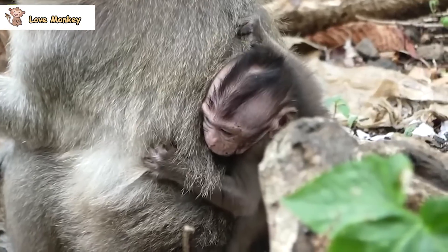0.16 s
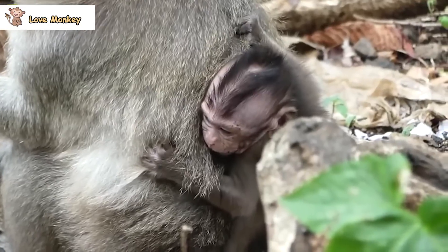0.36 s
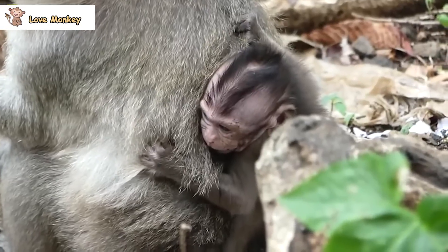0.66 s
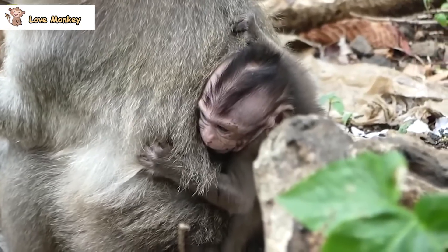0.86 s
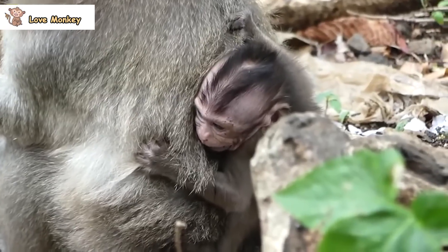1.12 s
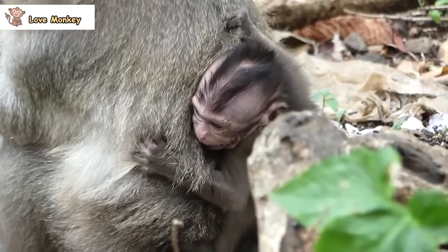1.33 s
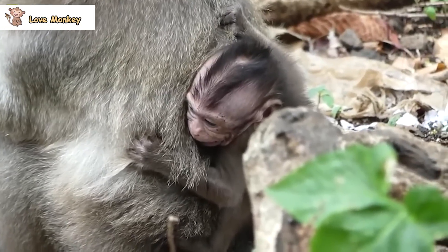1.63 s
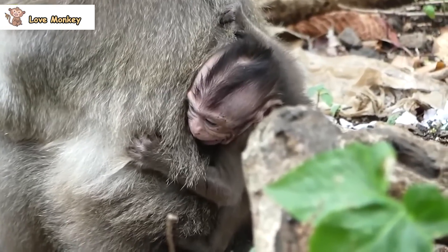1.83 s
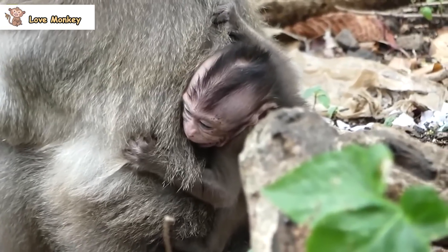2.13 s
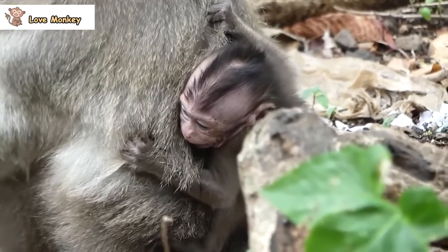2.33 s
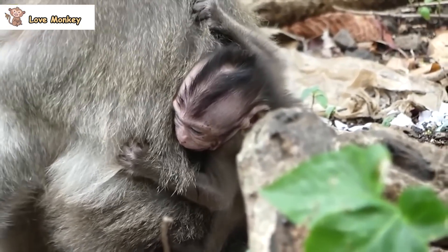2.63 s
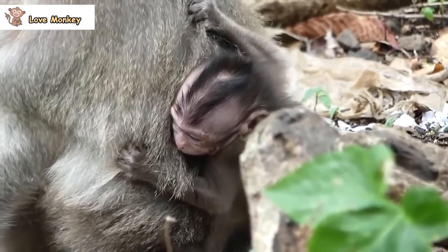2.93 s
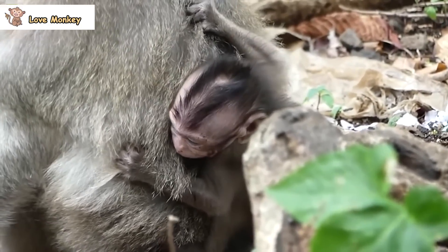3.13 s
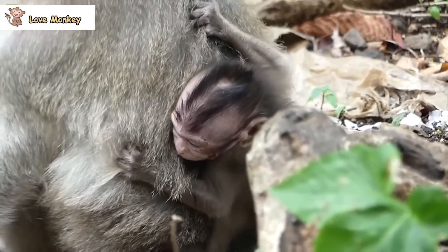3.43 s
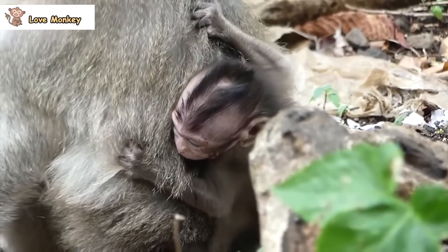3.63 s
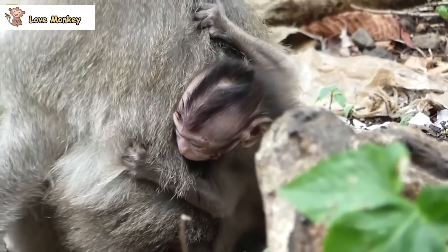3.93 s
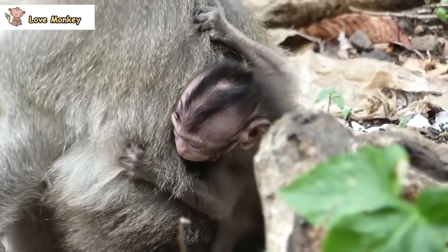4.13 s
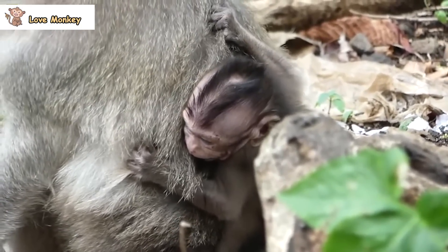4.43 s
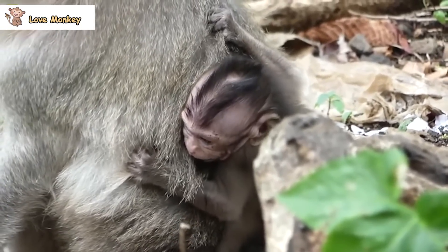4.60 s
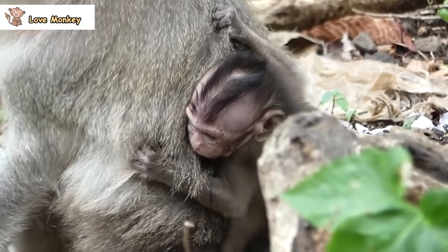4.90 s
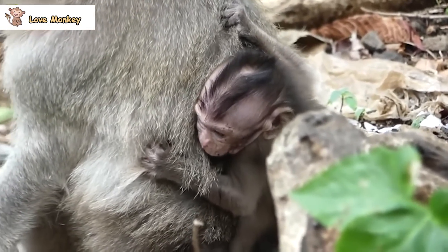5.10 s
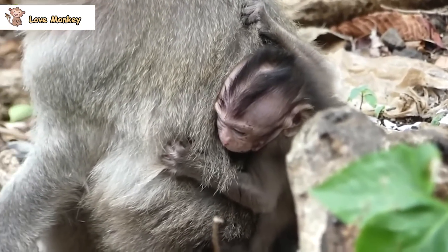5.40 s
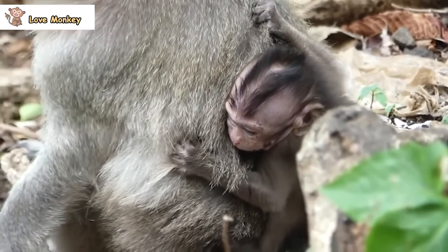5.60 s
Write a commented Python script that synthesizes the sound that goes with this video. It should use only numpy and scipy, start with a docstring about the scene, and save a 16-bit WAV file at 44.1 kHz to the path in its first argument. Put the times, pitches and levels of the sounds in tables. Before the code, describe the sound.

Three piercing infant monkey screams break into rasps and whistles, followed by softer whimper, yelp and rounded coo on a quiet forest floor.

```python
"""Baby macaque screaming on a forest floor

Close by, a hoarse squawk opens three shrill screams that break into rasps and whistles; whimper, yelp and coo follow.
Voices are summed partials, irregular under strain, filtered by throat tables; rasps are sliding air tones.
Leaves and twigs tick as ringing noise bursts; faint squeaks are softer voices of the same kind.
A far engine is a pulse train through exhaust resonances; foliage and distant traffic are coloured stereo noise."""
import sys
import numpy as np
from scipy import signal
from scipy.fft import rfft, irfft
from scipy.io import wavfile
from scipy.ndimage import uniform_filter1d, map_coordinates

SR = 44100
rng = np.random.default_rng(int(sys.argv[2]) if len(sys.argv) > 2 else 0)


def store_wav(level_fs):
    """Save 16-bit WAV to argv[1]."""
    pcm = np.round(np.clip(np.atleast_2d(level_fs), -1, 1) * 32767)
    wavfile.write(sys.argv[1], SR, pcm.T.astype(np.int16))


N = 253575
TIME = np.arange(N) / SR


def screams():
    """Three screams: a voiced climb up to the break, rough bursts, then clear loud sweeps."""
    # voiced openings: start_s, push_s, break_s, start_hz, break_hz, start_db, break_db
    climb_rows = [(.789, .886, .938, 1070, 1365, -47, -36.5), (1.305, 1.312, 1.337, 1080, 1410, -47, -36),
                  (1.795, 1.803, 1.828, 1160, 1410, -45, -31.5)]
    # broken voice: start_s, end_s, start_hz, end_hz, level_db, roughness (0-1)
    burst_rows = [(.933, .948, 1380, 1430, -35.5, .45), (.946, .961, 1370, 1410, -35, .55),
                  (.961, .979, 1370, 1410, -33.5, .45), (.982, 1.009, 1390, 1530, -33.5, .36),
                  (1.006, 1.036, 1580, 1790, -35, .28), (1.033, 1.048, 1440, 1560, -32.5, .55),
                  (1.333, 1.356, 1230, 1380, -36.5, .58), (1.354, 1.366, 1320, 1460, -35, .42),
                  (1.825, 1.850, 1200, 1520, -33, .56), (1.847, 1.861, 1520, 1930, -29.5, .42),
                  (1.860, 1.867, 1350, 1800, -31, .35)]
    # clear sweeps: start_s, peak_s, end_s, start_hz, end_hz, peak_db, roughness (0-1)
    sweep_rows = [(1.043, 1.058, 1.067, 3480, 3780, -28, .12),
                  (1.360, 1.371, 1.384, 2800, 3850, -27.7, .12),
                  (1.378, 1.385, 1.394, 3900, 4550, -36, .15), (1.541, 1.551, 1.555, 5400, 4450, -41, .25),
                  (1.551, 1.559, 1.573, 4650, 2500, -28, .28), (1.865, 1.869, 1.878, 3600, 4600, -21.3, .1),
                  (1.875, 1.878, 1.888, 4500, 5300, -39, .15), (2.125, 2.131, 2.145, 3650, 2650, -31, .17)]
    # throat and mouth while soft, pushed and broken: freq_hz, gain_db
    narrow_mouth = [(600, -22), (1120, -8), (1650, -18), (2000, -6), (2300, 0), (3150, -1), (3600, -10),
                    (4500, -19), (5400, -16), (6800, -21), (8000, -33), (10000, -28), (12500, -21),
                    (14500, -38)]
    scream_throat = [(600, -36), (1200, -12), (1650, -23), (2200, -9), (2700, 0), (3300, -5), (4000, -4),
                     (5100, -5), (5700, -18), (6500, -9), (8000, -30), (10000, -27), (12800, -27),
                     (14500, -40)]
    broken_throat = [(600, -36), (1200, -14), (1600, -23), (2000, -5), (2400, -5), (2800, -3), (3500, -1),
                     (4100, 2), (4900, -7), (5600, -21), (6900, -12), (8200, -27), (10000, -26),
                     (11500, -32), (13000, -28), (14500, -40)]

    climbs = [climb(row) for row in climb_rows]
    bursts = [burst(row) for row in burst_rows]
    sweeps = [glide(row, fade_db=9, power=1.4) for row in sweep_rows]
    voice = cries(climbs, scream_throat, soft_throat=narrow_mouth, jitter=.05, rasp=.7,
                  air_db=-21, flutter_db=.6, flicker_db=1, smear=.01)
    voice += cries(bursts, broken_throat, jitter=.04, rasp=.5, fade=1.2, air_db=-21, flutter_db=.2,
                   flicker_db=1.1, smear=.01, quaver=.02, second_db=6, break_hz=1660)
    voice += cries(sweeps, broken_throat, jitter=.05, rasp=.6, air_db=-27, flutter_db=.8,
                   smear=.01, second_db=-10)
    return voice


def whistling_tones():
    """One long wavering whistle, short glides, narrow bands ringing in the rasp, a squeak's upper partial."""
    # long whistle: time_s, pitch_hz, level_db
    long_whistle = [(1.425, 5918, -55), (1.439, 6075, -44), (1.449, 7257, -43), (1.459, 7607, -43),
                    (1.483, 7328, -42), (1.499, 7611, -43), (1.507, 8264, -49), (1.519, 8205, -49),
                    (1.548, 7076, -44)]
    # short tones and bands: start_s, peak_s, end_s, start_hz, end_hz, peak_db, roughness (0-1)
    tone_rows = [(.817, .826, .829, 3800, 4450, -50, .1), (.827, .834, .85, 4400, 3350, -49, .2),
                 (1.877, 1.886, 1.905, 13300, 13900, -46, .3), (1.898, 1.915, 1.93, 13600, 14300, -45, .3),
                 (1.922, 1.934, 1.945, 12600, 13400, -46, .3), (1.946, 1.955, 1.975, 12300, 11850, -38, .1),
                 (1.945, 1.985, 1.997, 3900, 4350, -43, .38), (2.003, 2.027, 2.055, 4150, 4500, -42.5, .38),
                 (1.98, 2.02, 2.06, 8950, 9250, -49, .25), (2.11, 2.128, 2.14, 4500, 4300, -35.5, .3),
                 (2.87, 2.885, 2.92, 7000, 6900, -63, .6)]
    # colouring: freq_hz, gain_db
    tone_colour = [(600, -28), (1500, -8), (3500, 1.5), (7500, -8), (12000, -28), (16000, -12)]
    calls = [waver(long_whistle, rough=.1, gain_db=0.0)]
    calls += [glide(row, fade_db=13, power=1.5) for row in tone_rows]
    return cries(calls, tone_colour, jitter=.1, rasp=.3, air_db=-21, flutter_db=1.6, second_db=-2)


def rasps(flutter_db=1.3, width=0.5):
    """Air forced through the closed throat sputters; the throat's resonance rises as it tightens."""
    # toneless rasps: start_s, peak_s, end_s, peak_db, treble_relative_db
    rasp_rows = [(.92, 1.03, 1.09, -60, 2), (1.3, 1.34, 1.41, -61, 1), (1.8, 1.84, 1.88, -59, 2),
                 (1.415, 1.47, 1.54, -58, 2), (1.533, 1.553, 1.6, -46, -1), (1.855, 1.89, 1.96, -50.5, 4),
                 (1.89, 2.02, 2.185, -46, 5), (2.078, 2.09, 2.1, -36.5, -8), (2.105, 2.124, 2.14, -40, -10)]
    # throat and the treble added to it: freq_hz, gain_db
    rasp_throat = [(600, -17), (1200, -17), (1700, -22), (2600, -13), (3300, -1), (4250, 6), (5100, 2.5),
                   (5600, -12), (6800, -2), (9000, -38), (15000, -60)]
    rasp_treble = [(4500, -24), (5600, -20), (6400, -2), (7500, 3), (8400, -3), (9150, 7), (9700, 2),
                   (10200, 5), (10700, 1), (12000, 12), (12450, 7), (13000, 10), (13700, 6), (14300, -12),
                   (15000, -35)]
    tighten_per_s, hold_after_peak_s = .9, .04
    out = np.zeros((2, N))
    for start, peak, end, peak_db, treble_db in rasp_rows:
        t, db = swell(start, peak, end, fade_db=18, power=2.6)
        count = len(t)
        # reading the sound ever faster raises its resonance
        read_at = np.cumsum(1 + tighten_per_s * np.minimum(t - peak, hold_after_peak_s))
        air = colour(sputter(count), rasp_throat)
        throat = map_coordinates(air, [read_at], order=3, mode="mirror")
        treble = steady(colour(sputter(count), rasp_treble))
        centre = steady(throat) + undb(treble_db) * treble
        # the highest hiss sounds diffuse
        side = width * undb(treble_db) * unit(colour(sputter(count), rasp_treble))
        envelope = undb(peak_db + db + flutter_db * walk(count, 301)) * soft_edges(t)
        add(out[0], t[0], (centre + side) * envelope)
        add(out[1], t[0], (centre - side) * envelope)
    return out


def sputter(count, depth_db=5, rate=60):
    """Unsteady air tones that slide about, flare up and die, each on its own."""
    slide_hz, blur_hz = 170, 190
    sound = 0
    for hz in range(1000, 15000, 450):
        pitch_hz = hz + slide_hz * walk(count, 55) + blur_hz * walk(count, 700)
        tone = np.sin(2 * np.pi * (rng.random() + np.cumsum(pitch_hz) / SR))
        sound = sound + tone * undb(depth_db * walk(count, rate))
    return sound / np.sqrt(uniform_filter1d(sound ** 2, size=900))


def whimper():
    """A whimper whose fundamental thins out as it goes on."""
    # path: time_s, pitch_hz, level_db before gain_db
    whimper_path = [(3.36, 870, -62), (3.382, 988, -51), (3.412, 1080, -48), (3.47, 1059, -49),
                    (3.532, 1262, -47.5), (3.556, 1200, -49), (3.572, 1100, -44), (3.636, 1118, -46),
                    (3.675, 1090, -50), (3.705, 1035, -58), (3.754, 1106, -59), (3.775, 1095, -68)]
    # throat: freq_hz, gain_db
    whimper_throat = [(600, -14), (1080, -5), (1260, -1), (1650, -18), (2200, 3), (2550, 0), (3250, -4),
                      (3750, -2.5), (4400, -3.5), (5000, -8), (5450, -20), (6600, -27), (7700, -41),
                      (9600, -24), (11000, -28), (12500, -20), (15000, -40)]
    return cries([waver(whimper_path, rough=.05, gain_db=-.7)], whimper_throat, jitter=.14, rasp=1.3,
                 air_db=-29, flutter_db=.5, smear=.01, thin_db=9, tire_db=2)


def yelp():
    """A softer cry built like a scream: climb, burst and sweep."""
    # climb: start_s, push_s, break_s, start_hz, break_hz, start_db, break_db
    climb_row = (4.078, 4.092, 4.156, 1060, 1340, -49, -42)
    # burst: start_s, end_s, start_hz, end_hz, level_db, roughness (0-1)
    burst_row = (4.151, 4.176, 1420, 1490, -41.5, .43)
    # sweep: start_s, peak_s, end_s, start_hz, end_hz, peak_db, roughness (0-1)
    sweep_row = (4.167, 4.177, 4.198, 1220, 2050, -43.5, .27)
    # throat: freq_hz, gain_db
    yelp_throat = [(600, -16), (1200, -5), (1700, -13), (2400, 0), (3100, -3), (3600, -3), (4300, -3),
                   (5400, -18), (6600, -21), (7700, -33), (9600, -21), (11000, -27), (12500, -21),
                   (15000, -40)]
    calls = [climb(climb_row), burst(burst_row), glide(sweep_row, fade_db=9, power=1.4)]
    return cries(calls, yelp_throat, jitter=.09, rasp=.8, fade=.5, air_db=-20, flutter_db=1,
                 flicker_db=1, smear=.02, second_db=1)


def squawk():
    """A hoarse opening squawk: one rough push of the folds."""
    # start_s, peak_s, end_s, start_hz, end_hz, peak_db, roughness (0-1)
    squawk_row = (.053, .08, .14, 775, 745, -47.5, .6)
    # throat: freq_hz, gain_db
    squawk_throat = [(600, -16), (1200, -5), (1700, -22), (2250, -7), (3100, 0), (3750, 0.5), (4500, -11),
                     (5200, -6), (6300, -10), (8000, -30), (15000, -40)]
    return cries([glide(squawk_row, fade_db=9, power=1.8)], squawk_throat, jitter=.07, rasp=1.1,
                 air_db=-22, flutter_db=.6)


def coo():
    """A clear coo: one pitch arch with a wavering top."""
    # arch: time_s, pitch_hz, level_db before gain_db
    coo_path = [(4.677, 1050, -65), (4.687, 1080, -57), (4.748, 1381, -42), (4.775, 1440, -39.5),
                (4.806, 1462, -39), (4.822, 1510, -40), (4.86, 1528, -38.5), (4.892, 1522, -38),
                (4.914, 1545, -42), (4.938, 1585, -39), (4.994, 1515, -40), (5.054, 1412, -42),
                (5.104, 1263, -47), (5.135, 1030, -62)]
    # throat: freq_hz, gain_db
    coo_throat = [(700, -16), (1250, -4), (1550, -11.5), (2300, -11), (3000, 0), (3800, -16), (4300, -15),
                  (4700, -26), (5400, -38), (6100, -35), (7600, -42), (9200, -21.5), (10700, -37),
                  (12000, -23), (12700, -18), (13700, -24), (14600, -44)]
    return cries([waver(coo_path, rough=0, gain_db=-.3)], coo_throat, jitter=.05, rasp=.5,
                 air_db=-36, flutter_db=.2, smear=.001, tire_db=3.2, quaver=.0025)


def squeaks():
    """Faint, blurred squeaks between the cries."""
    # start_s, peak_s, end_s, start_hz, end_hz, peak_db, roughness (0-1)
    squeak_rows = [(.2, .25, .32, 3620, 3420, -62, .4), (1.2, 1.29, 1.31, 3400, 2300, -54, .6),
                   (2.49, 2.53, 2.6, 4100, 2300, -61.5, .65), (2.565, 2.58, 2.65, 2550, 2250, -62, .35),
                   (2.65, 2.68, 2.78, 2150, 1400, -62, .5), (2.875, 2.885, 2.905, 3750, 3450, -60, .3),
                   (4.42, 4.48, 4.53, 2500, 1900, -60, .45), (5.2, 5.24, 5.34, 3850, 3000, -61, .55)]
    # throat: freq_hz, gain_db
    squeak_throat = [(600, -20), (1400, -3), (2300, 0), (3600, -2), (5000, -17), (15000, -40)]
    calls = [glide(row, fade_db=10, power=1.1) for row in squeak_rows]
    return cries(calls, squeak_throat, jitter=.2, rasp=.35, air_db=-22, flutter_db=1.3,
                 second_db=-12, smear=.04)


def cries(calls, throat, jitter, rasp, air_db, flutter_db, smear=0, second_db=0, fade=0,
          soft_throat=None, break_hz=None, tire_db=0, thin_db=0, quaver=0, flicker_db=.7):
    """Vibrating folds heard through the throat; under strain they turn irregular and hiss."""
    # hiss of air at the lips: freq_hz, gain_db
    air = [(1000, -14), (2500, -2), (4200, -16), (5700, -4), (6800, 9), (8300, -6), (10000, 6.5),
           (13500, -16), (16000, -36)]
    lips_part_db, mouth_wide_db, jaw_s = -46, -39, .045
    out = np.zeros(N)
    for t, hz, db, rough in calls:
        count = len(t)
        progress = np.linspace(0, 1, count)
        k = np.arange(1, 16)[:, None]  # partial numbers
        # higher partials flicker more, each on its own
        flicker = np.array([walk(count, 55) for _ in k])
        gains = (k * hz < SR * .4) * undb(np.minimum(k, 5.5) * flicker_db * flicker)
        # clear voice: second harmonic raised or lowered
        gains = gains * undb(second_db * (1 - rough) * (k == 2))
        # fundamental thins through the call
        gains = gains * undb(-thin_db * progress * (k == 1))
        # a long call dulls toward its end
        gains = gains * undb(-tire_db * progress ** 3 * np.log2(np.minimum(k, 4)))
        # fundamental drops out with roughness
        gains = gains * np.where(k == 1, np.clip(1 - fade * rough, 0, 1), 1)
        if break_hz:
            # pushed high, the voice flips to an almost pure tone an octave up
            modal = 1 / (1 + (hz / break_hz) ** 12)
            gains = gains * np.where(k % 2, modal, np.where(k > 2, modal + .035, 1))
        # slow tremor, then cycle-to-cycle scatter that blurs high partials first
        tremor = quaver * walk(count, 45) + .003 * walk(count, 130) + .03 * rough * walk(count, 330)
        scatter = (smear + jitter * rough ** 2) * walk(count, 1500)
        phase = 2 * np.pi * np.cumsum(hz * (1 + tremor + scatter)) / SR
        partials = gains * np.sin(k * phase + 2 * np.pi * rng.random(k.shape))
        folds = unit(partials.sum(0))
        # strong and weak cycles in twos and threes: lines between the harmonics
        twos = walk(count, 110) * np.sin(phase / 2)
        threes = walk(count, 120) * np.sin(phase / 3)
        folds *= 1 + 2 * rough ** 2 * (twos + threes)
        source = folds + rasp * rough ** 2 * noise(count, throat)
        tone = colour(source, throat)
        if soft_throat:
            # mouth narrow while soft, opening with the push; the jaw needs time to drop
            opening = np.clip((db - lips_part_db) / (mouth_wide_db - lips_part_db), 0, 1)
            opening = opening * (1 - np.exp(-(t - t[0]) / jaw_s))
            tone = opening * tone + (1 - opening) * colour(source, soft_throat)
        # effort, not the resonance a partial crosses, sets the loudness
        tone = steady(tone)
        # air hisses once a cycle
        hiss = undb(air_db) * (1 + .5 * np.cos(phase)) * noise(count, air)
        flutter = undb((flutter_db + 1.4 * rough) * walk(count, 330))
        add(out, t[0], (tone + hiss) * flutter * undb(db) * soft_edges(t))
    return out


def climb(row):
    """Pitch climbs until the voice breaks; the cry starts softly and is then pushed hard."""
    scoop_share, scoop_s, push_share, attack_db = .13, .012, .5, 9
    clear_rough, crack_rough, roughen_s = .14, .36, .01
    start, push, crack, start_hz, break_hz, start_db, break_db = row
    t = span(start, crack)
    onset = np.exp(-(t - t[0]) / scoop_s)
    effort = np.sin(np.pi / 2 * np.interp(t, [push, crack], [0, 1]))
    rise = (1 - push_share) * np.interp(t, [start, crack], [0, 1]) + push_share * effort
    # scoop up from below
    hz = (start_hz + (break_hz - start_hz) * rise) * (1 - scoop_share * onset)
    db = start_db + (break_db - start_db) * effort - attack_db * onset
    rough = clear_rough + (crack_rough - clear_rough) * np.exp((t - crack) / roughen_s)
    return t, hz, db, rough


def burst(row, fade_db=2.5):
    """One short, rough push of the broken voice, rising in pitch."""
    start, end, start_hz, end_hz, db, rough = row
    return glide((start, (start + end) / 2, end, start_hz, end_hz, db, rough), fade_db, power=2)


def glide(row, fade_db, power):
    """One swell of level while the pitch slides evenly."""
    start, peak, end, start_hz, end_hz, peak_db, rough = row
    t, db = swell(start, peak, end, fade_db, power)
    return t, np.interp(t, [start, end], [start_hz, end_hz]), peak_db + db, rough


def waver(curve, rough, gain_db):
    """A call whose pitch and level wander along a curve, the pitch smoothed."""
    s, hz, db = np.transpose(curve)
    t = span(s[0], s[-1])
    return t, uniform_filter1d(np.interp(t, s, hz), size=400), np.interp(t, s, db) + gain_db, rough


def swell(start_s, peak_s, end_s, fade_db, power):
    """Times and relative level (dB) of a push that grows to its peak and dies away."""
    t = span(start_s, end_s)
    return t, -fade_db * np.interp(t, [start_s, peak_s, end_s], [1, 0, 1]) ** power


def span(start_s, end_s):
    """Sample times of one call."""
    return TIME[int(start_s * SR):int(end_s * SR)]


def soft_edges(t):
    """Fade a call in and out over 3 ms."""
    return np.clip(np.minimum(t - t[0], t[-1] - t) / .003, 0, 1)


def steady(x):
    """Hold the level even over a few milliseconds."""
    return x / np.sqrt(np.maximum(uniform_filter1d(x ** 2, size=350), 0) + 1e-12)


def ticks(snap_s=0.001, crumple_s=0.012):
    """A dry leaf or twig snaps and crumples briefly: noise decays ring its resonances."""
    # time_s, peak_db, treble_peak_db, crumple_relative_to_snap_db
    tick_rows = [(.013, -43, -58, -9), (2.567, -39, -47, -31), (2.877, -45, -54, -20),
                 (2.888, -45, -56, -16), (3.622, -41, -60, -8), (3.744, -41, -60, -8),
                 (3.808, -47, -57, -7), (3.835, -31, -55, -17), (3.956, -35.5, -43, -26),
                 (4.017, -45, -52, -11), (4.065, -46, -50, 3), (4.353, -45, -49, -7), (4.362, -41, -55, -8)]
    # leaf and twig resonances: freq_hz, width_hz, gain_db
    twig = [(1290, 250, 2), (3000, 1100, 6), (5800, 670, -6.5)]
    out, t = np.zeros(N), TIME[:2048]
    for s, db, treble_db, crumple_db in tick_rows:
        envelope = np.exp(-t / snap_s) + undb(crumple_db) * np.exp(-t / crumple_s)
        crackle = rng.standard_normal(len(t)) * envelope
        body = ring(crackle, twig)
        crisp = ring(crackle, [(10100, 9900, 0)])
        add(out, s, undb(db) * body / abs(body).max() + undb(treble_db) * crisp / abs(crisp).max())
    return out


def engine(scatter_db=0.25, low_hz=80, high_hz=300):
    """Each firing of a far single cylinder thumps the exhaust; only the bass arrives."""
    # idle speed: time_s, firings_per_s
    idle = [(0, 21.5), (2.9, 21.5), (3.12, 19.6), (3.3, 20.7), (3.55, 21.28), (4.4, 21.3), (4.7, 21.5),
            (5.75, 21.5)]
    # time_s, level_db, bark_db
    levels = [(0, -61.5, -23), (1.5, -75, -21), (3.05, -57.5, -1), (3.15, -47.5, -1), (3.6, -49.5, 7.5),
              (4.4, -52, -1.5), (5.2, -50.5, -1), (5.75, -52, -6)]
    # exhaust resonances, deep boom and the bark above: freq_hz, width_hz, gain_db
    boom = [(110.4, 4, 1), (125.7, 6.7, 3.5)]
    bark = [(149.3, 11.3, -0.5), (169.7, 24, -10), (222, 80, -17)]
    firing_s = 3.549  # a firing falls here
    s, level_db, bark_level_db = np.transpose(levels)
    db = np.interp(TIME, s, level_db)
    bark_gain = undb(np.interp(TIME, s, bark_level_db))
    turns = np.cumsum(np.interp(TIME, *np.transpose(idle))) / SR
    turns -= np.interp(firing_s, TIME, turns)
    firings = np.diff(np.floor(turns), prepend=np.floor(turns[0]))
    firings = firings * undb(scatter_db * rng.standard_normal(N))
    thumps = ring(firings, boom) + bark_gain * ring(firings, bark)
    band = signal.butter(2, [low_hz, high_hz], "band", fs=SR, output="sos")
    thumps = signal.sosfilt(band, thumps)
    return unit(thumps / np.hypot(1, bark_gain)) * undb(db)


def hush(waver_db=-1.15, above_db=7.4):
    """Distant traffic and foliage: coloured noise, its stereo width set by frequency."""
    # spectrum: freq_hz, density_db_per_hz
    spectrum = [(15, -34), (28, -18.5), (45, -17.5), (80, -1.5), (130, 1), (280, -4), (420, -10),
                (750, -14.3), (1250, -14), (1900, -19), (4000, -24), (7500, -28.5), (10000, -30),
                (14000, -36), (15000, -50)]
    # level of the low middle, the whole lying above_db higher: time_s, level_db
    low_middle = [(0.0, -60), (0.67, -62), (1.49, -62), (2.15, -60), (2.56, -62), (4.21, -61), (4.68, -62),
                  (5.19, -61), (5.75, -62)]
    # stereo width: freq_hz, side_minus_mid_db
    side_width = [(30, 3), (90, -7), (250, 0.5), (600, 1.5), (1500, -2.5), (4000, -7), (12000, -24.5)]
    mid = noise(N, spectrum)
    side = colour(noise(N, spectrum), side_width)
    db = np.interp(TIME, *np.transpose(low_middle)) + above_db + waver_db * walk(N, 12)
    return np.array([mid + side, mid - side]) * undb(db)


def trees(x, near_db, far_db, near_t60=0.087, far_t60=0.63):
    """Direct sound, quick scatter from stones and ground, and a thin tail from the trunks."""
    t = TIME[:SR]

    def decay(t60):
        """Exponential decay of unit energy after a 2 ms gap."""
        return unit(undb(-60 * t / t60) * (t > .002)) / np.sqrt(SR)

    shape = np.hypot(undb(near_db) * decay(near_t60), undb(far_db) * decay(far_t60))
    # shared noise plus a separate part per channel
    echoes = shape * unit(rng.standard_normal(SR) + 0.5 * rng.standard_normal((2, SR)))
    return x + signal.fftconvolve(np.broadcast_to(x, (2, N)), echoes, axes=1)[:, :N]


def undb(db):
    """Decibels to gain."""
    return 10 ** (np.asarray(db) / 20)


def unit(x):
    """Scale to rms 1."""
    return x / np.sqrt(np.mean(x ** 2) + 1e-20)


def gain_at(hz, spectrum):
    """Gain of a (Hz, dB) table at any frequency."""
    f, db = np.transpose(spectrum)
    return undb(np.interp(np.log(np.maximum(hz, 1)), np.log(f), db))


def colour(x, spectrum):
    """Filter by a (Hz, dB) table."""
    return irfft(rfft(x) * gain_at(np.fft.rfftfreq(len(x), 1 / SR), spectrum), len(x))


def noise(count, spectrum):
    """Coloured noise of rms 1."""
    return unit(colour(rng.standard_normal(count), spectrum))


def walk(count, rate):
    """Smooth random curve of rms 1 that changes about rate times a second."""
    at = np.arange(count) * rate / SR
    return unit(map_coordinates(rng.standard_normal(count), [at], order=3, mode="wrap"))


def ring(x, modes):
    """Pass through parallel resonances (Hz, width Hz, dB)."""
    return sum(undb(db) * signal.lfilter(*signal.iirpeak(hz, hz / width, SR), x)
               for hz, width, db in modes)


def add(track, start_s, sound):
    """Mix a sound into a track."""
    i = int(round(start_s * SR))
    track[i:i + len(sound)] += sound[:N - i]


def scene():
    """The infant in front, leaves beside it, faint squeaks and the engine beyond."""
    voice = screams() + whimper() + yelp() + squawk() + whistling_tones()
    near = trees(voice + rasps() + ticks(), near_db=-10, far_db=-13)
    # the coo is sung into the mother's fur and hardly reaches the trees
    near += trees(coo(), near_db=-12, far_db=-20)
    far = trees(engine(), near_db=-13, far_db=-13) + trees(squeaks(), near_db=-5, far_db=-5)
    return near + far + hush()


def record(dry):
    """The microphone's top is cut steeply."""
    top_hz = 14700
    return signal.sosfilt(signal.ellip(8, .2, 70, top_hz, fs=SR, output="sos"), dry)


dry = scene()
out = record(dry)
store_wav(out)
```